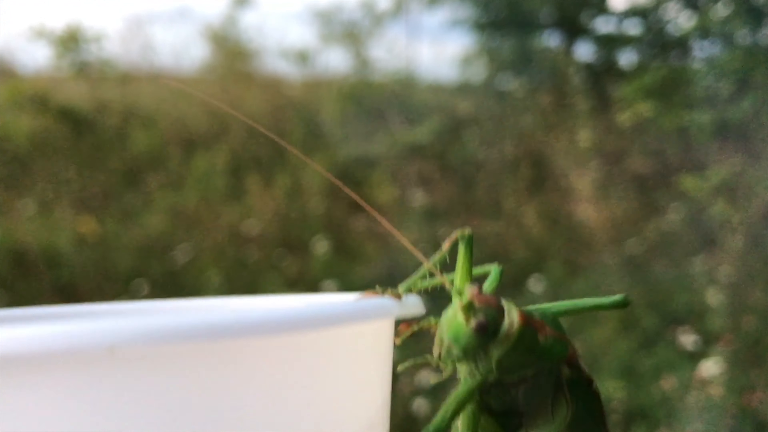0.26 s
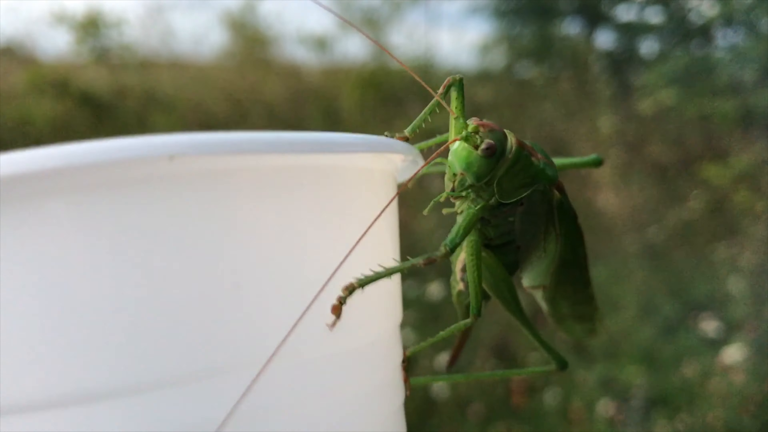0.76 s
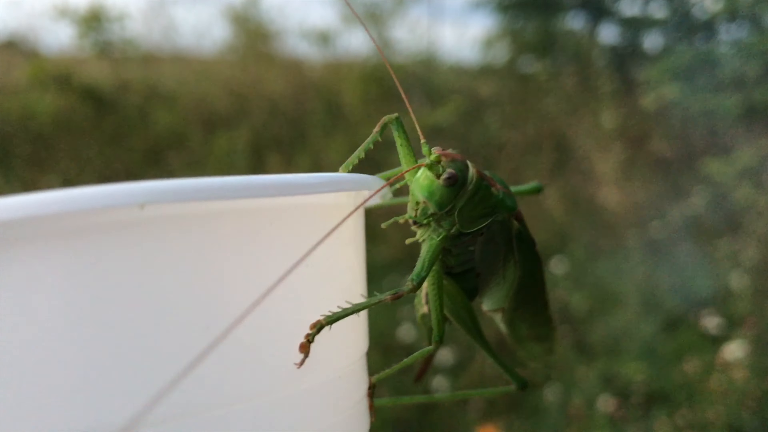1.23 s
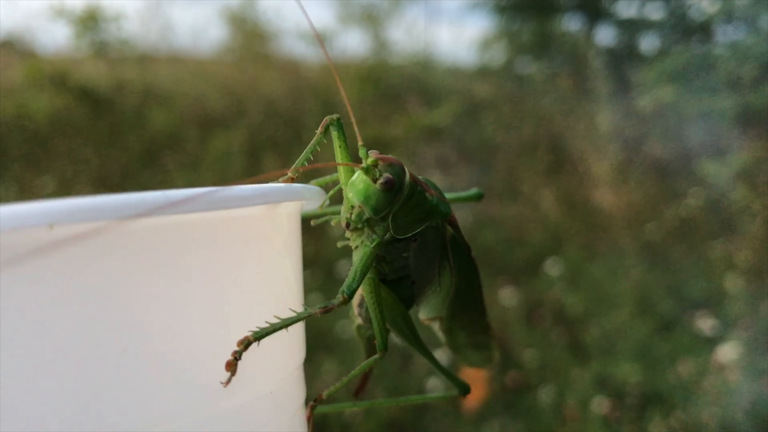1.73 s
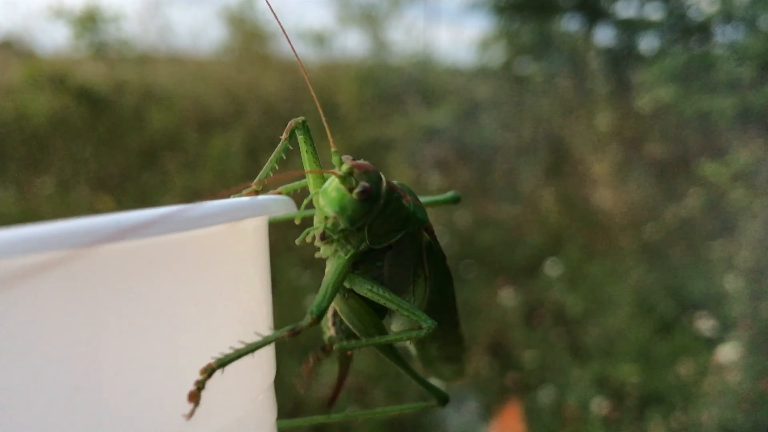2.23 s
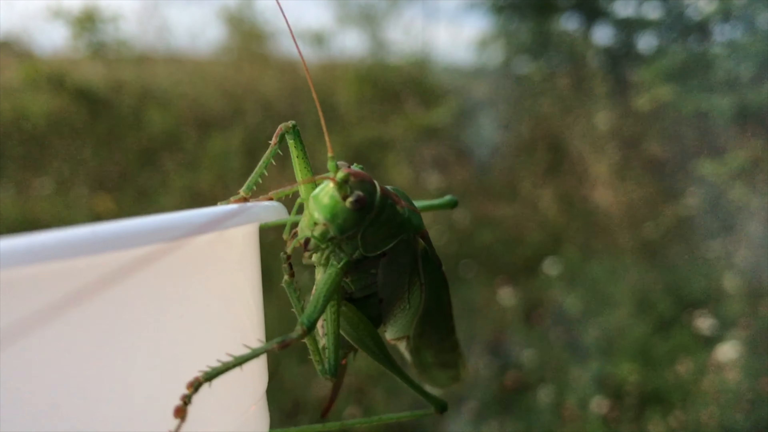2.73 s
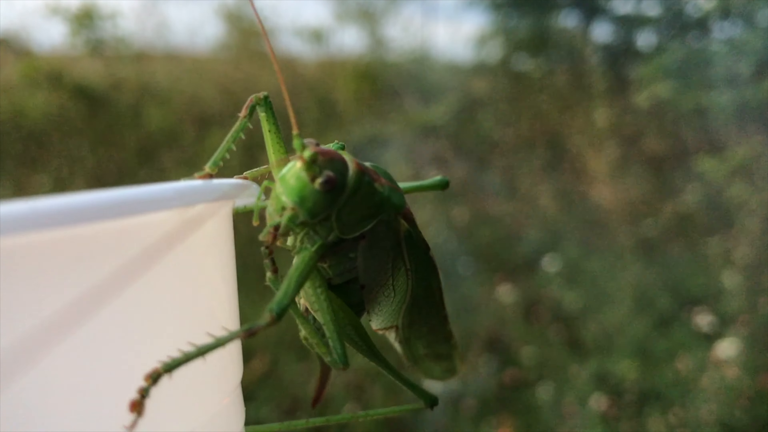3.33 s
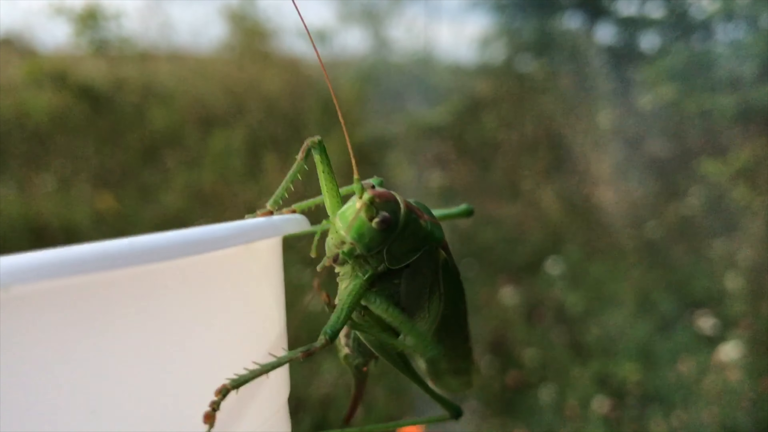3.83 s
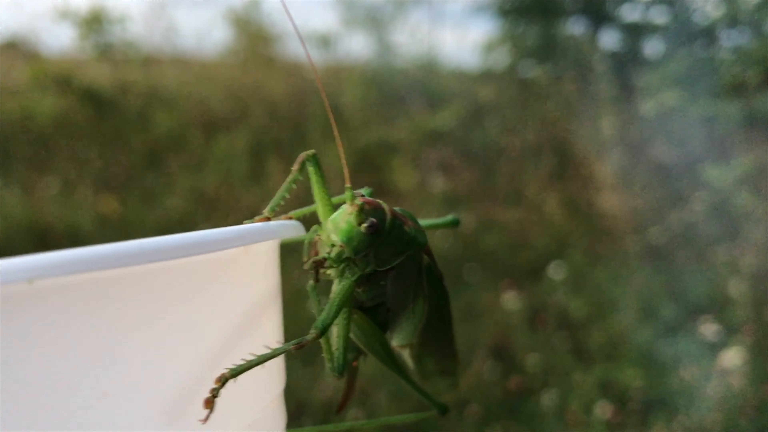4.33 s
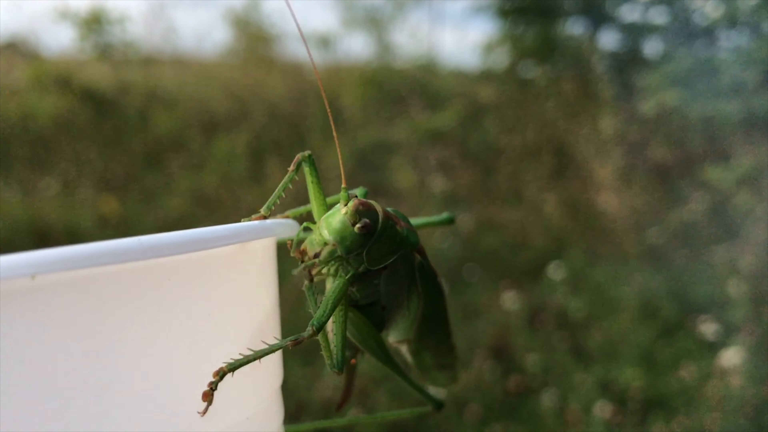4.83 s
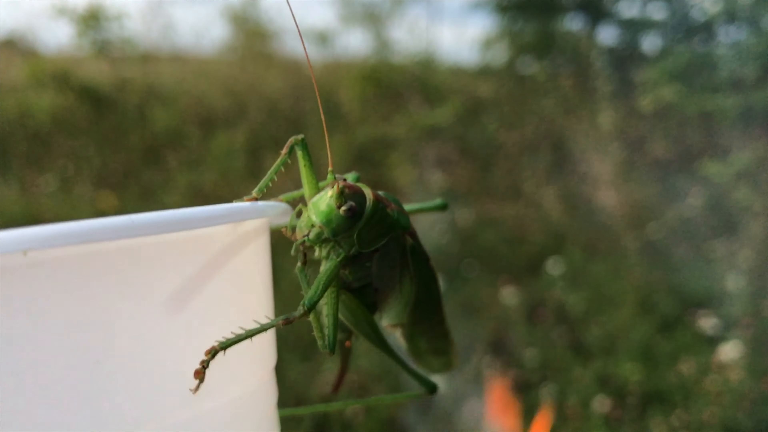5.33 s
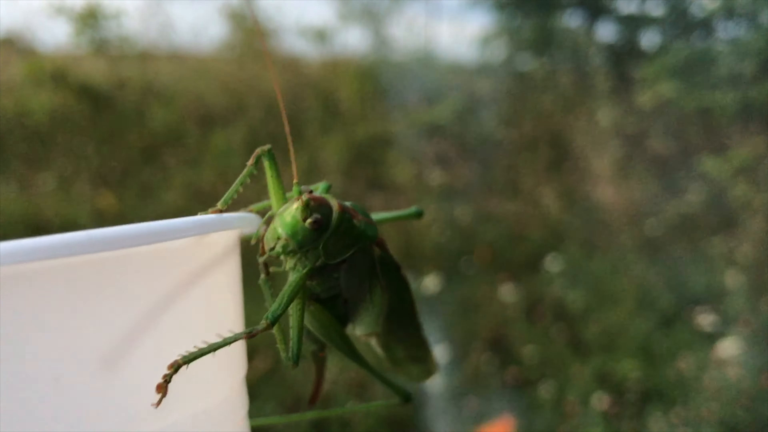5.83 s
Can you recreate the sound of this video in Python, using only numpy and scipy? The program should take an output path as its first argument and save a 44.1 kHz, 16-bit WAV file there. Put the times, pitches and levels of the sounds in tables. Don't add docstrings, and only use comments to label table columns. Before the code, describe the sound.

Two high-pitched insects rasp in open grass, captured close in wide stereo. Their rapid wing strokes, nearly twenty a second, slip in and out of step. The steady one fills the whole stretch; the other gives a short burst, rests, and comes back. Early on there are tiny clicks and a woody rattle, later a very faint passing rumble. A far flying insect hums weakly beneath, with quiet countryside air.

```python
import sys
import numpy as np
from scipy import signal
from scipy.fft import rfft, irfft
from scipy.io import wavfile

SR = 44100
rng = np.random.default_rng(int(sys.argv[2]) if len(sys.argv) > 2 else 0)


def pcm_store(signal):
    levels = np.round(np.clip(np.atleast_2d(signal), -1, 1) * 32767)
    wavfile.write(sys.argv[1], SR, levels.astype(np.int16).T)


def linear_from_db(decibels):
    return 10 ** (np.asarray(decibels, float) / 20)


N = 267687


def rms_one(x):
    return x / np.sqrt(np.mean(x ** 2) + 1e-20)


def to_left(db):
    return linear_from_db(np.array([[db], [-db]]))


def in_time(rows):
    s, *columns = np.transpose(rows)
    return [np.interp(np.arange(N) / SR, s, column) for column in columns]


def at_hz(points, hz):
    point_hz, value = np.transpose(points)
    return np.interp(np.log(hz + 1), np.log(point_hz), value)


def evenly(first_s, last_s, per_s):
    return np.linspace(first_s, last_s, max(round((last_s - first_s) * per_s), 1) + 1)


def drift(rate_hz):
    pole = np.exp(-80 * np.pi * rate_hz / SR)
    slow = signal.lfilter([1], [1, -2 * pole, pole ** 2], rng.standard_normal(N // 40 + 2002))[2000:]
    return np.interp(np.arange(N) / 40, np.arange(len(slow)), rms_one(slow))


def coloured(spectrum, alike):
    hz = np.arange(N // 2 + 1) * SR / N
    mid, side = rfft(rng.standard_normal((2, N))) * linear_from_db(at_hz(spectrum, hz))
    alike = np.clip(at_hz(alike, hz), -1, 1)
    common = np.sqrt(1 + alike) * mid
    opposed = np.sqrt(1 - alike) * side * [[1], [-1]]
    return rms_one(irfft(common + opposed, N))


# frequency in Hz, level in dB per Hz.
HUM_COLOUR = [(12, -32), (20, 6), (32, -1.5), (70, 1), (157, -4.5), (222, -5.5), (264, -8), (388, -13),
              (584, -18), (724, -20), (2170, -26), (2800, -29), (3400, -20.5), (4420, -46), (7480, -120)]
# frequency in Hz, correlation from -1 to 1.
FAR_LIKENESS = [(25, 0.86), (125, 0.83), (250, 0.67), (500, 0.44), (1000, 0.51), (2000, 0), (4000, 0)]


def countryside_hum():
    return linear_from_db(-50 + .5 * drift(2)) * coloured(HUM_COLOUR, FAR_LIKENESS)


# frequency in Hz, level in dB per Hz.
CHORUS_COLOUR = [(2530, -63), (4300, -18), (5450, -23), (5910, -14.5), (7490, -14.5), (9150, 4.5),
                 (10800, -5), (12500, 1), (15600, -28)]


def far_chorus():
    return linear_from_db(-39.5 + 3.6 * drift(9.3)) * coloured(CHORUS_COLOUR, [(5000, 0.02), (12000, -0.49)])


def far_rumble(peak_s=4.56, width_s=0.77, peak_db=-64):
    away = (np.arange(N) / SR - peak_s) / width_s
    colour = [(180, -32), (280, -6), (400, 3.0), (550, -10), (900, -30)]
    return linear_from_db(peak_db - 6 * away ** 2) * coloured(colour, FAR_LIKENESS)


# time in seconds, frequency in Hz, level in dB.
WING_BEAT = [(0, 236.7, -58), (.15, 241.6, -54), (.3, 245.5, -70), (.95, 259, -69), (1.15, 258, -58),
             (1.58, 260.5, -53), (1.62, 230.7, -57.5), (2.6, 234, -57), (3.1, 235.7, -63),
             (4.0, 225.1, -69), (4.7, 220.4, -58.5), (5.3, 217, -67), (5.5, 217, -75)]


def far_drone(waver_hz=2.78):
    hz, db = in_time(WING_BEAT)
    tone = np.sin(2 * np.pi * np.cumsum(hz + waver_hz * drift(4.2)) / SR)
    return np.sqrt(2) * linear_from_db(db - 1.5 + 3.9 * drift(13.4)) * tone * to_left(.7)


# first knock in seconds, last knock in seconds, knocks per second, peak in dB, ring in Hz.
RATTLE_RUNS = [
    (0.0308, 0.396, 27.3, -40, 2200),
    (0.4309, 0.6374, 29, -41, 2200),
    (0.6674, 0.911, 41, -45, 1965),
    (0.9353, 1.28, 40.5, -46, 1974),
    (5.5227, 5.759, 30, -51, 2070),
    (5.7847, 6.0162, 39, -51, 1900),
    (6.0491, 6.09, 30, -43, 2190),
]


def knock(hz, turn_a, turn_b):
    t = np.arange(SR // 20) / SR
    shape = (1 - np.exp(-t / .001)) * linear_from_db(-60 * t / .018)
    tone = np.sin(2 * np.pi * hz * t)
    tone += 0.74 * np.sin(2 * np.pi * (hz * (0.816 + 0.17 * turn_a) * t + turn_b))
    tone += 0.32 * np.sin(2 * np.pi * (hz * (0.626 + 0.056 * turn_b) * t + turn_a))
    return shape * tone


def rattle_haze(rise_db_per_s=80, fade_db_per_s=22, haze_db=-18.5):
    now = np.arange(N) / SR
    levels_db = []
    for first_s, last_s, _, run_db, _ in RATTLE_RUNS:
        early_db = rise_db_per_s * np.maximum(first_s - now, 0)
        late_db = fade_db_per_s * np.maximum(now - last_s, 0)
        levels_db.append(run_db - early_db - late_db)
    colour = [(1000, -10.5), (1500, -8), (2200, -1.5), (2400, -8), (2550, -53)]
    return linear_from_db(np.max(levels_db, axis=0) + haze_db) * coloured(colour, [(100, 0.28), (9000, 0.16)])


def rattle(spread_db=2.0, spread_share=.02, jitter_s=.0008):
    out = np.zeros(N + SR)
    for first_s, last_s, per_s, run_db, run_hz in RATTLE_RUNS:
        for s in evenly(first_s, last_s, per_s):
            turn_a, turn_b = rng.random(size=2)
            late, strong, high = rng.standard_normal(size=3)
            one = linear_from_db(run_db + spread_db * strong) * knock(run_hz * (1 + spread_share * high), turn_a, turn_b)
            out[round((s + jitter_s * late) * SR):][:len(one)] += one
    out = out[:N] + 0.37 * np.roll(out[:N], round(.013 * SR))
    return out * to_left(.8) + rattle_haze()


# time in seconds, peak in dB.
SCRAPER_SNAPS = [(0.0084, -39), (0.06, -50), (0.1096, -46), (0.265, -44), (0.3264, -47), (0.3738, -37.5),
                 (2.9703, -47), (4.6314, -51), (4.9818, -44), (5.7934, -41), (6.046, -45)]


def snaps(ring_hz=4300, t60_s=0.0017, gain_db=11.5):
    out, t = np.zeros(N + SR), np.arange(SR // 200) / SR
    for s, peak_db in SCRAPER_SNAPS:
        ring = np.sin(2 * np.pi * ring_hz * t)
        out[round(s * SR):][:len(t)] += linear_from_db(peak_db + gain_db - 60 * t / t60_s) * ring
    highpass = signal.butter(2, 2500, "high", fs=SR, output="sos")
    return signal.sosfilt(highpass, out[:N]) * to_left(1.5)


def strokes_of(bouts, gap_s, spread_db=-0.2):
    strokes = []
    for bout in bouts:
        s, force_db = np.transpose(bout)
        spans = [evenly(a, b, 1 / gap_s) for a, b in zip(s, s[1:])]
        at = np.unique(np.concatenate(spans).round(decimals=6))
        strokes += zip(at, np.interp(at, s, force_db) + spread_db * rng.standard_normal(len(at)))
    return strokes


def file_teeth(strokes, db, last_ms, last_gap_ms, speedup, loudest_ms, loss_db_per_ms2, echo_ms, echo_db, count):
    start_s, force_db = np.transpose(strokes)
    chance = rng.standard_normal((len(strokes), 6, count))
    gaps_ms = last_gap_ms * speedup ** np.arange(count) * (1 + .1 * chance[:, 0])
    before_ms = np.cumsum(gaps_ms, axis=1) - gaps_ms[:, :1]
    after_start_ms = last_ms + 0.76 * chance[:, 1, :1] - before_ms
    at = ((start_s[:, None] + after_start_ms / 1000) * SR).astype(int) - 40
    size = linear_from_db(db + force_db[:, None] - loss_db_per_ms2 * (before_ms - loudest_ms) ** 2)
    size *= linear_from_db(1.7 * chance[:, 2])
    echo_delay = (echo_ms * (1 + .15 * chance[:, 5]) * SR / 1000).astype(int)
    at = np.hstack([at, at + echo_delay])
    return at, np.hstack([size, size * linear_from_db(echo_db + 2.5 * chance[:, 1])])


def scrape(at, size, ring_hz, spread_hz, ring_ms, click_db, rasp_db):
    pitch, phase = rng.standard_normal((2, *at.shape))
    heard = (at >= 0) & (at < N)
    k = np.arange(96)
    swell = np.sin(np.pi * np.clip(1000 * k / (ring_ms * SR), 0, 1)) ** 2
    swell = swell / np.sqrt(np.sum(swell ** 2) / 2)
    hz = ring_hz + spread_hz * np.clip(pitch[heard], -1.8, 1.8)
    burst = swell * np.sin(2 * np.pi * hz[:, None] * k / SR + 9 * phase[heard][:, None])
    burst[:, 8] += linear_from_db(click_db)
    teeth, bumps = np.zeros((2, N + len(k)))
    np.add.at(teeth, at[heard][:, None] + k, size[heard][:, None] * burst)
    np.add.at(bumps, at[heard], size[heard])
    slip = signal.lfilter([1], [1, -np.exp(-1000 / (1.2 * SR))], bumps[:N])
    rasp = rng.standard_normal((2, N)) + 0.51 * rng.standard_normal(N)
    return teeth[:N] + linear_from_db(rasp_db) * slip * rasp


def scatter(source, leaves_db, near_t60_s=.014, far_t60_s=.2, far_db=-17):
    t = np.arange(SR // 8) / SR
    decay = linear_from_db(-60 * t / near_t60_s) + linear_from_db(far_db - 60 * t / far_t60_s)
    tails = rng.standard_normal((2, len(t))) * decay * (t > .0005)
    return source + linear_from_db(leaves_db) * signal.fftconvolve(source, tails, axes=1)[:, :N]


def wing_response(spectrum, turn_rad=0, size=1024):
    hz = np.arange(size // 2 + 1) * SR / size
    skirt_db = -14 * np.log2(np.maximum(spectrum[0][0] / (hz + 20), 1))
    cepstrum = irfft(np.log(linear_from_db(at_hz(spectrum, hz) + skirt_db)))
    cepstrum[1:size // 2] *= 2
    cepstrum[size // 2 + 1:] = 0
    return np.roll(irfft(np.exp(rfft(cepstrum) + 1j * turn_rad)), 32)[:size // 2]


def through_wings(source, left, right, turn_rad):
    wings = np.array([wing_response(left), wing_response(right, turn_rad)])
    wings = wings / np.sqrt(np.sum(wings ** 2) / 2)
    return signal.fftconvolve(source, wings, axes=1)[:, :N]


# frequency in Hz, level in dB.
PAUSING_WING_LEFT = [(3000, -47), (4000, -37.5), (5000, -28), (6000, -27.5), (7000, -13), (7700, -8),
                     (8400, -14.5), (9200, -2.5), (10000, -7), (10800, -4), (11500, -12), (12300, -9.5),
                     (13500, -18), (15500, -21)]
PAUSING_WING_RIGHT = [(3000, -77.5), (4000, -63), (5000, -33), (6000, -18.5), (7000, -29.5), (7700, -9),
                      (8400, -6.5), (9200, -10), (10000, -9.5), (10800, -7), (11500, -14), (12300, -24),
                      (13500, -16.5), (15500, -28.5)]
# time in seconds, force in dB.
PAUSING_BOUTS = [
    [(0.008, -16), (0.268, -16), (0.428, -15.5), (0.486, -18.5)],
    [(2.117, -24.5), (2.42, -21), (2.67, -20.5), (2.924, -19), (3.977, -19), (4.129, -17.5), (4.678, -17.5),
     (4.881, -19), (5.031, -18.5), (5.747, -18), (6.048, -17)],
]


def pausing_singer():
    at, size = file_teeth(strokes_of(PAUSING_BOUTS, gap_s=.051), db=12.0, last_ms=4.5, last_gap_ms=2.85,
                          speedup=.92, loudest_ms=3.5, loss_db_per_ms2=.075, echo_ms=1.3, echo_db=-9, count=15)
    source = scrape(at, size, ring_hz=10040, spread_hz=730, ring_ms=1.2, click_db=-7, rasp_db=-17)
    source = scatter(source, leaves_db=-29)
    return through_wings(source, PAUSING_WING_LEFT, PAUSING_WING_RIGHT, turn_rad=-3.0)


# frequency in Hz, level in dB.
STEADY_WING_LEFT = [(3000, -52), (4000, -70.5), (5000, -20.5), (6000, -18.5), (7000, -4.5), (7700, 2.5),
                    (8400, -36), (9200, 0.5), (10000, -9), (10800, -0.5), (11500, -14.5), (12300, -8.5),
                    (13500, -21), (15500, -28)]
STEADY_WING_RIGHT = [(3000, -37.5), (4000, -31.5), (5000, -21.5), (6000, -32), (7000, -5.5), (7700, -0.5),
                     (8400, -1.5), (9200, -3.5), (10000, 0), (10800, -2.5), (11500, 0), (12300, -29.5),
                     (13500, -18.5), (15500, -15.5)]
# time in seconds, force in dB.
STEADY_STROKES = [(0.043, -20.5), (0.539, -21.5), (0.809, -20.5), (1.363, -21.5), (2.464, -21.5),
                  (2.68, -21), (2.792, -22), (3.008, -20.5), (3.392, -21.5), (3.664, -22), (4.05, -21),
                  (4.268, -21), (4.589, -21.5), (5.187, -21.5), (5.293, -23.5), (5.737, -20), (6.061, -21)]


def steady_singer():
    at, size = file_teeth(strokes_of([STEADY_STROKES], gap_s=.0547), db=6.5, last_ms=6.5, last_gap_ms=2.5,
                          speedup=.95, loudest_ms=6, loss_db_per_ms2=.036, echo_ms=.65, echo_db=-3, count=28)
    source = scrape(at, size, ring_hz=9550, spread_hz=1150, ring_ms=.7, click_db=-3, rasp_db=-12)
    source = scatter(source, leaves_db=-26)
    return through_wings(source, STEADY_WING_LEFT, STEADY_WING_RIGHT, turn_rad=1.74)


def scene():
    background = countryside_hum() + far_chorus() + far_rumble() + far_drone() + rattle()
    return background + snaps() + pausing_singer() + steady_singer()


def top_cut(x):
    return signal.sosfilt(signal.butter(12, 15750, fs=SR, output="sos"), x)


def record(dry):
    rounded = 1.3 * np.tanh(dry / 1.3)
    steep = signal.ellip(12, .3, 60, 15750, fs=SR, output="sos")
    return top_cut(signal.sosfilt(steep, rounded))


dry = scene()
out = record(dry)
pcm_store(out)
```